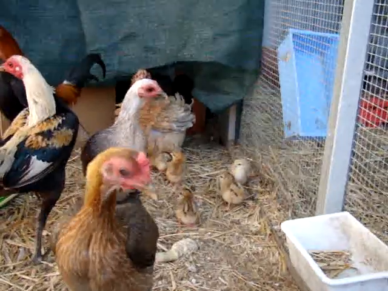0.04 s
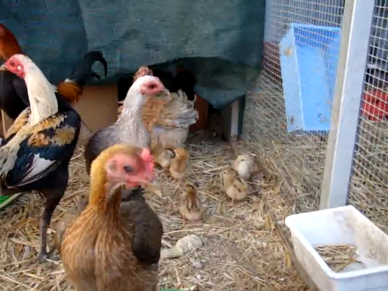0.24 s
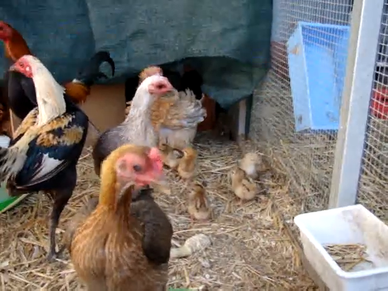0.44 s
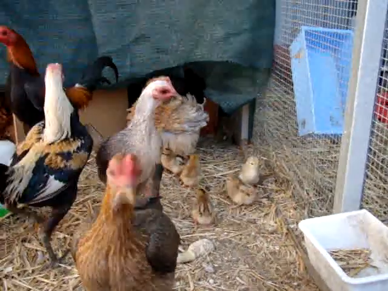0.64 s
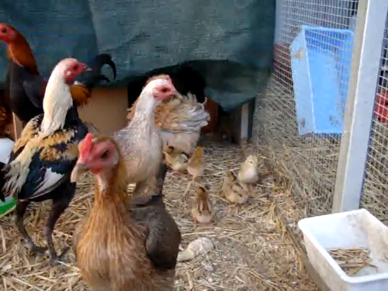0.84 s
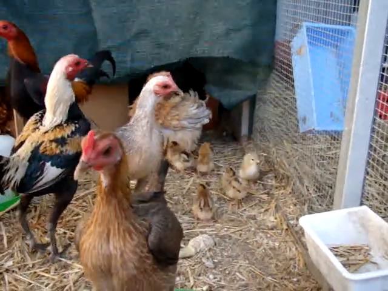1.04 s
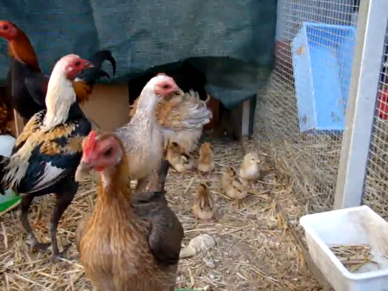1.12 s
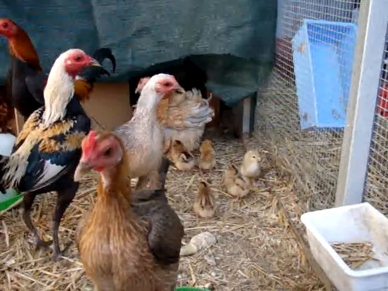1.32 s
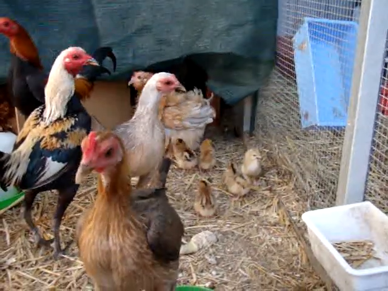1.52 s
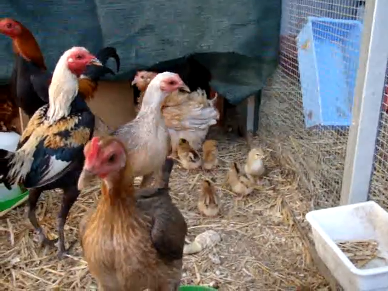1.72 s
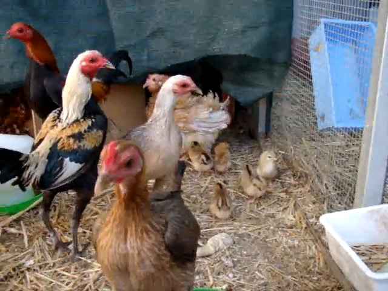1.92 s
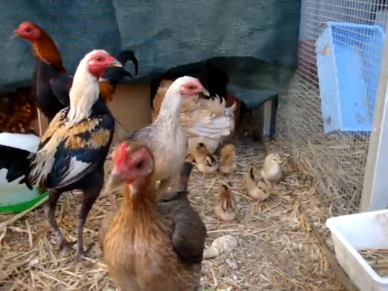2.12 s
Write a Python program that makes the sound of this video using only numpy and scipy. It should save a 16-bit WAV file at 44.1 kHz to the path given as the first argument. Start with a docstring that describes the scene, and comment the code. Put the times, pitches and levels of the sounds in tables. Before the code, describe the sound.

Harsh squeaky scrape of dragged sheet metal, followed by soft hen clucks and tiny chick cheeps

```python
"""Hens and chicks in a straw-floored wire pen, over a quiet yard murmur of shaped noise with far chicks.
First a sheet-metal object is dragged: scraping noise, gliding squeaks and ringing modes; one thin tone sings on.
Then straw swishes in crackly noise and chicks cheep in short whistles, mostly falling.
A hen clucks three times, throat pulses and breath through resonances; before the last cluck another
starts to croon a rising, husky note built of smeared partials."""
import sys
import numpy as np
from scipy import signal
from scipy.fft import rfft, irfft, next_fast_len
from scipy.io import wavfile
from scipy.ndimage import uniform_filter1d, map_coordinates

SR = 44100
rng = np.random.default_rng(int(sys.argv[2]) if len(sys.argv) > 2 else 0)


def persist_wave(psi):
    """Save psi, clipped to +-1, as 16-bit WAV."""
    counts = np.round(np.clip(psi, -1, 1) * 32767).astype(np.int16)
    wavfile.write(sys.argv[1], SR, np.atleast_2d(counts).T)


N = 94815


def amp(db):
    """dB to gain."""
    return 10 ** (np.asarray(db) / 20)


def unit(x):
    """x scaled to rms 1."""
    return x / np.sqrt(np.mean(x ** 2) + 1e-20)


def along(points, hz):
    """(Hz, value) points interpolated on a log frequency axis."""
    f, v = np.transpose(points)
    return np.interp(np.log(hz + 1), np.log(f + 1), v)


def curves(rows, fade_s=0.03):
    """One value per sample for each column after time, then a gate open while the table lasts."""
    s, *cols = np.transpose(rows)
    t = np.arange(N) / SR
    gate = np.clip(np.minimum(t - s[0], s[-1] + fade_s - t) / fade_s, 0, 1)
    return [np.interp(t, s, c) for c in cols] + [gate]


def wobble(knots_per_s, size=N):
    """Smooth random curve through normally distributed knots."""
    knots = rng.standard_normal(int(size * knots_per_s / SR) + 4)
    return map_coordinates(knots, [np.arange(size) * knots_per_s / SR])


def filtered(x, response):
    """x through a complex response of frequency [Hz]."""
    m = next_fast_len(len(x) + SR // 2)
    return irfft(rfft(x, m) * response(np.fft.rfftfreq(m, 1 / SR)), m)[:len(x)]


def resonance(x, hz, width_hz):
    """x through two equal band-pass resonances in series; width_hz is that of one."""
    def response(f):
        damping = 1j * f * width_hz
        return (damping / (hz * hz - f * f + damping)) ** 2
    return filtered(x, response)


def rush(spectrum, patchy_db):
    """Coloured noise of rms 1 with time-frequency patches of random gain."""
    z = signal.stft(rng.standard_normal(N + 512), nperseg=512)[2]
    field = uniform_filter1d(rng.standard_normal(z.shape), 4, 0)
    field = uniform_filter1d(field, 6, 1)
    x = signal.istft(z * amp(patchy_db * unit(field)), nperseg=512)[1][:N]
    return unit(filtered(x, lambda hz: amp(along(spectrum, hz))))


def add(track, s, x):
    """Mix x into track at time s."""
    part = track[round(s * SR):][:len(x)]
    part += x[:len(part)]


def glide(length_s, first_hz, last_hz, bend=1):
    """Phase of a gliding tone and its rounded envelope."""
    u = np.linspace(0, 1, round(length_s * SR))
    phase = 2 * np.pi * np.cumsum(first_hz + (last_hz - first_hz) * u ** bend) / SR
    return phase, np.abs(np.sin(np.pi * u ** 0.57)) ** 0.83


# murmur spectrum shape: (frequency [Hz], relative level [dB])
YARD_SPECTRUM = [(24, -56), (40, -31), (63, -7), (153, -9), (184, -5.5), (232, -8.5), (292, -4),
                 (335, -9.5), (376, -8), (474, -9.5), (1020, -9.5), (1110, -10), (1610, -12.5),
                 (2560, -16.5), (10000, -26), (13000, -78), (22000, -120)]
# murmur level: (time [s], level [dB])
YARD_LEVEL = [(0, -46), (.9, -45.5), (1.35, -49.5), (1.7, -48), (2.15, -48)]
# far chicks: (time [s], level [dB])
TWITTER_LEVEL = [(0, -55), (1.0, -59), (1.6, -59), (1.8, -56.5), (2.15, -60.5)]
TWITTER_HZ, TWITTER_WIDTH_HZ = 2680, 780


def yard():
    """Distant murmur of slowly swelling coloured noise, with far chicks blurred to a noise band."""
    level_db, twitter_db = curves(YARD_LEVEL)[0], curves(TWITTER_LEVEL)[0]
    murmur = amp(level_db + 0.5 * wobble(7.68)) * rush(YARD_SPECTRUM, patchy_db=2.5)
    twitter = unit(resonance(rng.standard_normal(N), TWITTER_HZ, TWITTER_WIDTH_HZ))
    return murmur + amp(twitter_db + 2.5 * wobble(28)) * twitter


# reverberation: (frequency [Hz], t60 [s])
PEN_DECAY = [(200, 0.87), (1000, 0.78), (4000, 0.59), (10000, 0.53)]


def pen(x):
    """Walls and roof answer: a noise tail in which each frequency dies at its own speed."""
    hz, t, z = signal.stft(rng.standard_normal(SR), SR, nperseg=256)
    decay = amp(-60 * t / along(PEN_DECAY, hz)[:, None])
    tail = signal.istft(z * decay, SR, nperseg=256)[1]
    late = np.pad(x, (400, 0))  # 9 ms pre-delay
    return signal.fftconvolve(late, tail / np.linalg.norm(tail))[:N]


# swishes: (start [s], length [s], level [dB])
SWISHES = [(1.03, 0.059, -44.5), (1.907, 0.025, -55)]
# spectrum shape: (frequency [Hz], relative level [dB])
STRAW_SPECTRUM = [(1470, -38), (2500, -7), (2730, -9), (3500, -8), (10200, -15), (13300, -64),
                  (22000, -120)]


def straw():
    """Brief swishes: noise bursts made crackly by fast random gain."""
    level = np.zeros(N)
    for s, length_s, db in SWISHES:
        add(level, s, amp(db) * glide(length_s, 0, 0)[1])
    return level * amp(4.3 * wobble(280)) * rush(STRAW_SPECTRUM, patchy_db=6.0)


# cheeps: (start [s], length [s], level before common gain [dB], first pitch [Hz], last pitch [Hz])
CHEEPS = [(1.045, 0.0476, -46, 3190, 2420), (1.216, 0.025, -46, 3055, 2746), (1.236, .022, -59, 2700, 2850),
          (1.425, 0.04313, -53, 2710, 2190), (1.915, 0.031, -50.5, 3300, 2700),
          (1.939, 0.03, -47, 2530, 2520), (1.994, .025, -53, 2420, 2435)]
CHEEP_GAIN_DB = 3.5
CHEEP_BEND = 0.48  # exponent under 1: pitch moves early, then levels off


def chicks():
    """Short gliding whistles, made slightly husky by random level and phase."""
    out = np.zeros(N)
    for s, length_s, db, first_hz, last_hz in CHEEPS:
        phase, env = glide(length_s, first_hz, last_hz, CHEEP_BEND)
        level = amp(db + CHEEP_GAIN_DB + 2.5 * wobble(250, size=len(env)))
        add(out, s, level * env * np.sin(phase + 1.05 * wobble(320, size=len(env))))
    return out


# croon: (time [s], mean pitch [Hz], level [dB], fundamental re level [dB])
CROON = [(1.76, 390, -62, 2), (1.805, 405.2, -51, 4.5), (1.84, 398.8, -57.5, -3), (1.875, 405.4, -49.5, 1),
         (1.91, 423.7, -42, -1), (1.94, 436, -48, -5), (1.97, 440.6, -47.5, -5), (1.99, 465.4, -44.5, -9),
         (2.012, 455.3, -49.5, -10), (2.035, 467.5, -38, -9), (2.058, 478.5, -46, -2),
         (2.075, 500, -45, -9), (2.106, 519, -42.5, -6), (2.136, 524, -39, -10), (2.15, 508, -42, -6)]
# overtones: (multiple of pitch, re level [dB])
CROON_OVERTONES = [(2, 1), (3, -10), (4, -15.5), (5, -16.5), (6, -26)]
QUAVER_KNOTS_PER_S, QUAVER_DB = 44.97, 1.5
HUSK, HUSK_KNOTS_PER_S = 0.65, 150
CROAK_DB, CROAK_HZ, CROAK_WIDTH_HZ = -3.5, 740, 990  # breathy noise, dB re smoothed level


def croon():
    """Soft, husky rising voice that quavers, each partial smeared on its own, in breathy noise."""
    hz, level_db, first_db, gate = curves(CROON)
    phase = 2 * np.pi * np.cumsum(hz * (1 + 0.0149 * wobble(80))) / SR
    voice = np.zeros(N)
    for k, db in [(1, first_db)] + CROON_OVERTONES:
        in_phase = 1 + HUSK * wobble(HUSK_KNOTS_PER_S)
        quadrature = HUSK * wobble(HUSK_KNOTS_PER_S)
        voice += amp(db) * (in_phase * np.sin(k * phase) + quadrature * np.cos(k * phase))
    voice *= amp(level_db + QUAVER_DB * wobble(QUAVER_KNOTS_PER_S))
    croak = unit(resonance(rng.standard_normal(N), CROAK_HZ, CROAK_WIDTH_HZ))
    smooth_db = uniform_filter1d(level_db, size=SR // 16)
    return gate * (voice + amp(smooth_db + CROAK_DB) * croak)


# clucks: (first mean pitch [Hz], last mean pitch [Hz], low throat [Hz], high throat first [Hz],
#          high throat last [Hz], chest re low [dB], upper re high [dB], rasp re high [dB])
CLUCKS = [(319.9, 380, 674, 1260, 1416, -24, -22.5, -36.5), (314, 346, 597, 1760, 1484, -7, -13.5, -15),
          (329.8, 330, 670, 2130, 1230, -14, -5, -9)]
# throat levels, one list per cluck: (time [s], low level [dB], high level [dB])
CLUCK_LEVELS = [
    [(1.138, -63, -63), (1.148, -38.5, -40), (1.16, -42.5, -40.5), (1.172, -33.5, -30), (1.202, -49, -47.5),
     (1.23, -60, -61), (1.235, -65, -60)],
    [(1.63, -61, -68), (1.636, -43, -39), (1.65, -32.5, -31), (1.67, -34, -26), (1.708, -50, -45.5),
     (1.73, -46, -52.5)],
    [(2.085, -53, -42), (2.095, -37, -53.5), (2.107, -28.5, -31.5), (2.117, -33, -31.5), (2.133, -51, -39),
     (2.15, -52, -50)],
]
CLUCK_GLIDE_S, JITTER, BREATHY, SHIMMER_DB = 0.042, 0.03, 0.83, 2
LOW_WIDTH_HZ, HIGH_WIDTH_HZ, CHEST_WIDTH_HZ = 315, 260, 160
UPPER_HZ, UPPER_WIDTH_HZ = 2800, 1070


def clucks():
    """Uneven throat pulses and gated breath through chest and throat resonances; the high one moves."""
    out = np.zeros(N)
    for voice, rows in zip(CLUCKS, CLUCK_LEVELS):
        first_hz, last_hz, low_hz, high_hz, high_end_hz, chest_db, upper_db, rasp_db = voice
        low_db, high_db, gate = curves(rows, fade_s=0.006)
        u = np.clip((np.arange(N) / SR - rows[0][0]) / CLUCK_GLIDE_S, 0, 1)
        pitch_hz = (first_hz + (last_hz - first_hz) * u) * (1 + JITTER * wobble(150))
        cycle = np.cumsum(pitch_hz) / SR
        pulses = unit(np.diff(np.floor(cycle), prepend=0) * amp(SHIMMER_DB * wobble(212)))
        breath = unit(rng.standard_normal(N) * np.exp(-1.5 * (cycle % 1)))  # fades within each cycle
        source = pulses + BREATHY * breath

        deep = unit(resonance(source, low_hz, LOW_WIDTH_HZ))
        deep += amp(chest_db) * unit(resonance(source, first_hz, CHEST_WIDTH_HZ))
        bright = np.sqrt(1 - u) * unit(resonance(source, high_hz, HIGH_WIDTH_HZ))
        bright += np.sqrt(u) * unit(resonance(source, high_end_hz, HIGH_WIDTH_HZ))
        bright += amp(upper_db) * unit(resonance(source, UPPER_HZ, UPPER_WIDTH_HZ))
        bright += amp(rasp_db) * breath
        out += gate * (amp(low_db) * deep + amp(high_db) * bright)
    return out


SING_HZ, SING_DB, SING_FROM_S, SING_FULL_S, SING_T60_S = 1127, -41, 0.3, 0.52, 5.4


def singing():
    """One mode of the sheet: builds up during the drag, then fades slowly, long after it."""
    t = np.arange(N) / SR
    rise = np.clip((t - SING_FROM_S) / (SING_FULL_S - SING_FROM_S), 0, 1)
    fade_db = -60 * np.maximum(t - SING_FULL_S, 0) / SING_T60_S
    return amp(SING_DB + fade_db + 1.2 * wobble(12)) * rise * np.sin(2 * np.pi * SING_HZ * t)


# drag: (time [s], level before layer gains [dB], rumble re level before its gain [dB], hiss re level [dB])
DRAG = [(0.13, -63, 3, -7), (0.178, -39.5, -1.5, -14), (0.2, -36, 5.5, 3), (0.21, -30, -27, -15.5),
        (0.234, -24.5, -16, -6.5), (0.264, -29, 0, -6), (0.304, -36.5, -11, -15), (0.312, -34.5, -8, -19),
        (0.326, -23.5, -6.5, -7), (0.348, -21.5, 1, -7.5), (0.394, -25, 0.5, -14), (0.456, -24.5, -3.5, -3),
        (0.546, -24.5, -24, -6.5), (0.57, -21.5, -2.5, -8.5), (0.638, -24.5, -17, -7.5),
        (0.658, -21, -38, -9), (0.688, -24, -23, -5), (0.732, -24.5, -13, -12), (0.8, -40, -6, -11)]
# spectrum shapes: (frequency [Hz], relative level [dB])
SCRAPE_SPECTRUM = [(290, -34.5), (500, -5), (536, -13.5), (739, -6), (842, -12.5), (913, -10), (1180, -6),
                   (1380, -6), (1590, -8.5), (1840, -1.5), (5500, -17), (7150, -37), (12100, -120)]
RUMBLE_SPECTRUM = [(76, -58), (130, -21), (303, -8), (382, -7), (475, -7), (513, -8), (700, -5), (910, -32),
                   (1540, -120)]
HISS_SPECTRUM = [(2470, -41), (4200, -13), (4870, -1.5), (5530, 4.5), (6070, 5), (9610, -4.5),
                 (10200, -14.5), (13300, -44.5), (22000, -120)]
# modes of the sheet: (frequency [Hz], relative level [dB], t60 [s])
SHEET_MODES = [(310, -1.5, 0.13), (492.4, -1.5, 0.41), (904, -2.5, 0.36), (953.4, -3, 0.64), (991, 1, 0.19),
               (1236.2, 1, .5), (1346, 2.5, 0.4), (1464, 1, 0.5), (1585, -4, 0.25), (2167, -12, .5),
               (2650, -18.5, 0.46), (3106, -4, 0.24), (3640, -2.5, 0.3), (4000, -20, 0.79)]
# rough squeaks: (start [s], length [s], level [dB], first pitch [Hz], last pitch [Hz], smear [knots/s])
SQUEAKS = [(0.164, 0.072, -35, 310, 288, 92), (0.23, 0.085, -26, 1380, 1257, 170),
           (0.309, 0.059, -26, 310, 334, 168), (.34, .06, -27, 1827, 1867, 195),
           (.36, .16, -31.5, 493, 482, 40.7), (0.423, .06, -24.5, 1596, 1450, 194),
           (0.457, 0.0894, -15.5, 1880, 1841, 255.7), (0.453, 0.092, -19, 1600, 1600, 791.5),
           (0.527, 0.073, -27.5, 3725, 3518, 896), (0.652, 0.049, -29, 4000, 4020, 200),
           (0.632, .08, -25.5, 1298, 1387, 166), (0.638, 0.034, -23, 2350, 2285, 297),
           (0.702, 0.051, -25, 1522, 1537, 391)]
SCRAPE_GAIN_DB, RUMBLE_GAIN_DB, RING_GAIN_DB = 3, -4, -3
DRAG_CUT_HZ = 81  # second-order bass roll-off of the drag sound


def drag():
    """Gritty friction noise in three layers keeps the sheet's modes ringing; squeaks are smeared glides."""
    level_db, rumble_db, hiss_db, gate = curves(DRAG)
    grit = gate * amp(level_db + 0.56 * wobble(59.3) + 1.24 * wobble(300))
    scrape = grit * amp(SCRAPE_GAIN_DB) * rush(SCRAPE_SPECTRUM, patchy_db=2.0)
    hiss = grit * amp(hiss_db) * rush(HISS_SPECTRUM, patchy_db=5.5)
    rumble = gate * amp(level_db + rumble_db + RUMBLE_GAIN_DB + 0.54 * wobble(69.2))
    rumble *= rush(RUMBLE_SPECTRUM, patchy_db=2.0)

    t = np.arange(N) / SR
    ring = sum(amp(db - 60 * t / t60_s) * np.sin(2 * np.pi * hz * t) for hz, db, t60_s in SHEET_MODES)
    rung = signal.fftconvolve(grit * rng.standard_normal(N), ring / np.linalg.norm(ring))[:N]
    out = scrape + hiss + rumble + amp(RING_GAIN_DB) * rung

    for s, length_s, db, first_hz, last_hz, knots_per_s in SQUEAKS:
        phase, env = glide(length_s, first_hz, last_hz)
        in_phase = wobble(knots_per_s, size=len(env)) + 0.55
        quadrature = wobble(knots_per_s, size=len(env))
        add(out, s, amp(db) * env * (in_phase * np.cos(phase) + quadrature * np.sin(phase)))
    return filtered(out, lambda hz: hz ** 2 / np.hypot(hz ** 2, DRAG_CUT_HZ ** 2))


METAL_PEN_DB, BIRDS_PEN_DB = -10, -14.5  # reverberation sends


def scene():
    """Yard, birds, straw and metal, with the pen's reverberation, in one channel."""
    metal = drag()
    birds = clucks() + croon() + chicks() + straw()
    echo = pen(amp(METAL_PEN_DB) * metal + amp(BIRDS_PEN_DB) * birds)
    return (metal + singing() + birds + echo + yard())[None]


LOW_CUT_HZ, TOP_HZ = 156, 10300


def record(dry):
    """First-order bass roll-off and a sharp upper band limit."""
    return filtered(dry[0], lambda hz: (hz < TOP_HZ) * hz / np.hypot(hz, LOW_CUT_HZ))[None]


dry = scene()
out = record(dry)
persist_wave(out)
```